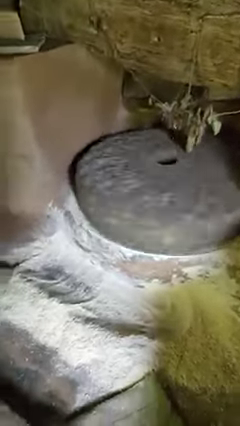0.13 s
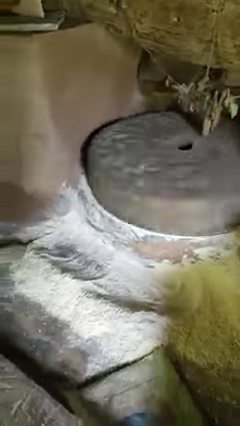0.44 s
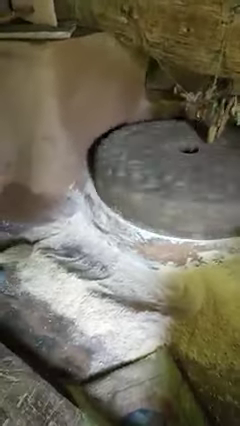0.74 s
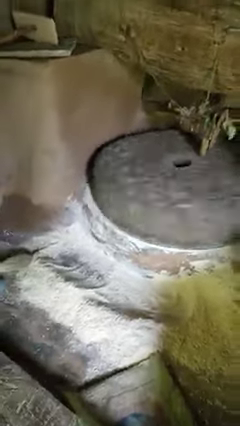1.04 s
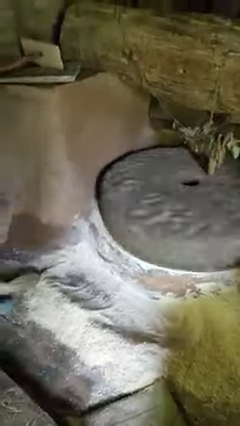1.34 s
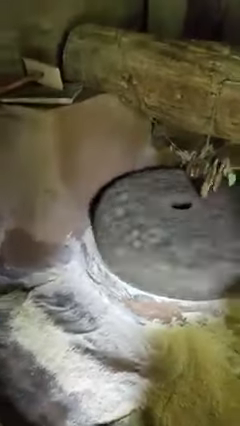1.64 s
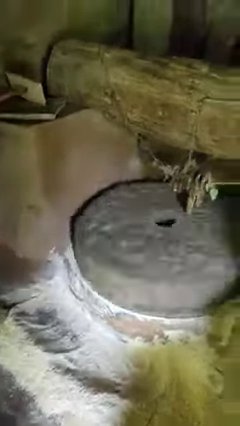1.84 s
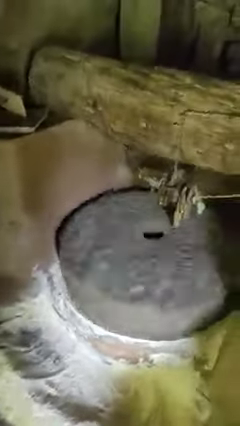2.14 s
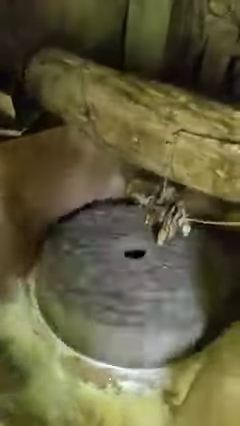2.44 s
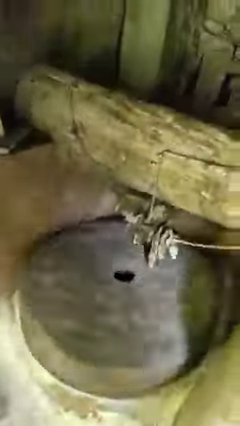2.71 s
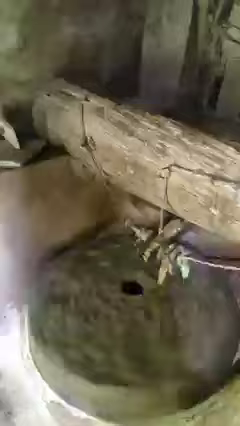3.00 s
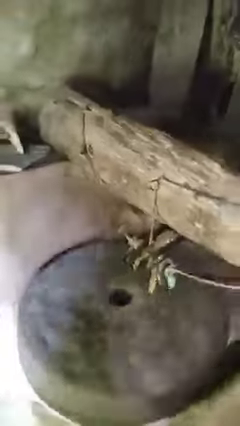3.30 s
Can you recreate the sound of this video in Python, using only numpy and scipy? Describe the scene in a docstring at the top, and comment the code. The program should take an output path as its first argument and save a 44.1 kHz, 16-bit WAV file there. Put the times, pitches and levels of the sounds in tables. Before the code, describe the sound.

Close stereo phone pickup of a working millstone: steady rough grinding with fine crackle, rushing water beneath, irregular wooden knocks that grow louder and denser in the second half, and a brief splash near the end.

```python
"""A turning millstone heard from close by in a small water mill: random grit impulses and noise excite
the resonances of stone and frame, with short groans and cracking kernels. A feed stick clacks about seven
times a second: a blow, a ring of decaying modes, a rattle of shaped noise and a reverberant tail. Water, as
patchy noise with fizzing drops and one splash, rushes under the floor. A hand-held phone with two
microphone ports, alike only in the bass, adds very low wobbles and a murmur of the grip."""
import sys
import numpy as np
from scipy import signal
from scipy.fft import rfft, irfft, next_fast_len
from scipy.io import wavfile
from scipy.ndimage import uniform_filter1d, map_coordinates

SR = 44100
rng = np.random.default_rng(int(sys.argv[2]) if len(sys.argv) > 2 else 0)


def digitize_waveform(pressure):
    """Quantize a signal to 16-bit integers and store it at the path in sys.argv[1].

    Rows of a 2-D input are taken as channels; values are limited to [-1, 1].
    """
    field = np.atleast_2d(pressure).T
    bounded = np.clip(field, -1, 1)
    quanta = np.round(bounded * 32767).astype(np.int16)
    wavfile.write(sys.argv[1], SR, quanta)


N = 152586  # length in samples

# Grinding level before the groans: time_s, level_db
GRIND_LEVEL = [(0.0, -40.5), (0.2, -30), (0.38, -38.5), (1.33, -35.5), (1.77, -37), (2.11, -36.5),
               (2.47, -32), (2.88, -38), (3.1, -32.5), (3.46, -34)]
# Resonances of stone and frame: centre_hz, width_hz, level_db
FRAME_MODES = [(172.3, 35.6, -4.5), (235.8, 27, -4.5), (297, 19.4, -0.5), (360, 66.5, -6),
               (408.5, 58, -6.5), (560.4, 25.4, -6.5), (901, 48, -9)]
# Swells of one resonance: centre_s, level_db (rms at the crest), pitch_hz
GROAN_EVENTS = [(0.014, -30, 285), (0.151, -24, 285), (0.263, -32.5, 167), (0.278, -26, 285),
                (0.551, -30, 280), (0.9, -30, 291), (1.329, -35, 377), (1.333, -30, 190),
                (1.469, -34.5, 236.4), (1.603, -27, 296), (1.605, -27.5, 393), (1.671, -33, 404),
                (1.741, -33.5, 285), (1.825, -29.5, 404), (1.952, -31.5, 398), (2.048, -32, 409),
                (2.073, -29, 280), (2.356, -28.5, 269), (2.417, -33, 280), (2.435, -31.5, 363),
                (2.438, -31.5, 409), (2.506, -29, 275), (2.669, -32, 275), (2.791, -33.5, 280),
                (2.9, -32.5, 172), (3.075, -31, 280), (3.122, -31, 415), (3.259, -32.5, 388),
                (3.422, -31, 393)]
# Resonances of cracking kernels: centre_hz, width_hz, level_db
KERNEL_MODES = [(990, 250, 0), (1980, 400, -2), (3000, 900, -4), (5000, 1800, -4)]
# Clacks of the stick: start_s, rattle_db (before its fade), blow_db, ring_db, tilt_db_per_octave
CLACK_EVENTS = [(.204, -25, -26, -32, -4.5), (.295, -26, -21.5, -36, -6.5), (.449, -28, -19, -45, 2),
                (.49, -29, -36, -44, -6.5), (.718, -30.5, -30, -46, -8), (.852, -30.5, -31, -30, -7.5),
                (.96, -34, -24, -36, -7), (1.296, -26.5, -17.5, -32, -4.5), (1.441, -33, -30, -28.5, -8),
                (1.649, -19, -15, -28, 1), (1.897, -26, -21, -38, -4), (2.03, -28.5, -22, -28, -5),
                (2.181, -28, -20.5, -21.5, -5), (2.318, -31, -20, -29, 2), (2.343, -35, -35, -42, 4),
                (2.415, -29.5, -19, -25.5, -0.5), (2.514, -29.5, -20, -36, -6),
                (2.637, -23.5, -12, -24.5, 0.5), (2.731, -48, -20.5, -30, -3),
                (2.815, -32.5, -22, -31.5, -14), (2.918, -31, -14, -24.5, 0.5), (3.047, -31, -29, -22.5, 9),
                (3.146, -29.5, -15, -19, 0), (3.225, -32, -18, -22.5, 0.5), (3.365, -34, -16, -23.5, -8)]
# Modes of the stick: pitch_hz, level_db (relative), t60_s
STICK_MODES = [(780, -5, .06), (915, -6, .1), (1062, -1, .125), (1250, -6, .05), (1760, -8, .07),
               (1980, -4, .13)]
# Spectrum of the rattle: frequency_hz, level_db (relative)
RATTLE_SPECTRUM = [(450, -19), (800, -5.5), (1050, 4), (1400, 0.5), (1800, 6), (2050, -1), (2350, 6.5),
                   (2800, 1.5), (3150, -16), (3550, 1), (4000, -5.5), (4500, 1.5), (5000, -12), (6000, -33),
                   (7500, -70)]
# Reverberation time of the room: frequency_hz, t60_s
ROOM_DECAY = [(300, 0.54), (1500, 0.17), (6000, 0.18)]
# Course of the water level, before its fluctuation: time_s, level_db
WATER_LEVEL = [(0, -27.5), (.42, -29.5), (1.79, -29.5), (2.08, -30.5), (2.92, -29.5), (3.1, -26.5),
               (3.46, -30.5)]
# Spectrum of the water above the floor's filtering: frequency_hz, level_db (relative, per Hz)
WATER_SPECTRUM = [(65, -22), (110, -12), (166, -1.5), (283, 5.5), (333, -1), (409, 3), (642, -9.5),
                  (929, -11), (1290, -12.5), (1940, -13), (3910, -14), (4600, -17.5), (5420, -12.5),
                  (7080, -26), (7530, -45), (8010, -58.5), (8690, -41.5), (13100, -35.5), (14800, -53)]
# Splashes, against the rush before colouring: full_s, level_db
SPLASH_EVENTS = [(3.112, 7)]
# Low wobbles of the hand: centre_s, length_s, level_db
HAND_WOBBLES = [(1.769, 0.17, -38), (1.919, 0.22, -34), (2.192, 0.32, -30), (2.492, 0.17, -20),
                (3.18, 0.23, -40)]
# Gain of the side signal, the half-difference of the ports: frequency_hz, side_gain_db
SIDE_GAIN = [(60, -40), (140, -27), (210, -20), (320, -19), (490, -11), (750, -3.5), (900, 1), (1060, 0),
             (1400, 0), (14400, -.7)]
# Right port's delay behind the left as the phone turns: time_s, lag_ms
PORT_LAG = [(0, 0.43), (1.2, 0.41), (1.5, -0.015), (3.46, -0.047)]

# Stone and kernels
GRIT_PER_S, GRIT_SPREAD_DB = 1500, 2
FRAME_LOW_HZ = 130  # the frame radiates little below this
GROAN_RISE_S, GROAN_FALL_S = 0.014, 0.017  # Gaussian widths
CRUNCH_PER_S, CRUNCH_SPREAD_DB, CRUNCH_DB = 700, 2, -38.5
# Stick
BLOW_HZ, BLOW_S = 950, .00075  # pitch, and time to the envelope's crest, of a clack with no upward tilt
TICK_DB, TICK_HZ, TICK_T60 = -6, 2300, .004  # a bright tick on the blow
HARD_DB_PER_OCTAVE = 5  # this much upward tilt makes the blow half as long and an octave higher
RING_RISE_S, RING_ROUGH_DB, RING_ROUGH_S = 0.0014, 3, .006  # the loose stick's ring flutters
RATTLE_RISE_S, RATTLE_HOLD_S, RATTLE_T60 = 0.0018, .014, .14
CHATTER_DB, CHATTER_S = 1.5, 0.0012  # the rattle comes in small clumps
ACROSS, ACROSS_S = 0.36, 0.00023  # share and delay of the direct sound in the side signal
ROOM_DB = -8
# Water
DROPS_PER_S, DROP_HZ, DROP_CYCLES, DROP_DB = 1500, 4000, 1.6, -14  # fizz on the rush
SPLASH_RISE_S, SPLASH_HOLD_S, SPLASH_T60, SPLASH_HZ = 0.0039, 0.027, 0.12, 3660
SPLASH_TICK_DB, SPLASH_TICK_T60 = -8, 0.024
WATER_THIN_HZ, WATER_THIN_DB = 550, -9  # the floor boards keep its bass back
# Hand, ports and band limit
WOBBLE_HZ, SWAY_DB = 30, -49
SHUFFLE_DB, SHUFFLE_HZ, SHUFFLE_LUMPS_DB = -57, 68, 5  # uneven low murmur of the grip
SHARED, SHARED_HZ = .18, 800  # part of the left port's treble that also reaches the right
LEFT_DB = -.6  # gain of the left port's treble
TOP_HZ = 14700


def stone():
    """Forced resonance: grit under the stone drives the frame; at times one resonance swells to a groan."""
    grit = unit(grains(GRIT_PER_S, GRIT_SPREAD_DB)) + 0.99 * rng.standard_normal((2, N))
    lumps = amp(1.3 * wobble(6.37) + 1.5 * wobble(15))
    grind = amp(curve(GRIND_LEVEL)) * unit(filtered(grit * lumps, frame))
    phases = rng.random((len(GROAN_EVENTS), 2))  # in turns, one for each channel
    for (centre, db, hz), phase in zip(GROAN_EVENTS, phases):
        middle = round(centre * SR)
        near = slice(max(middle - SR // 10, 0), min(middle + SR // 10, N))
        t = np.arange(near.start, near.stop) / SR
        u = (t - centre) / np.where(t < centre, GROAN_RISE_S, GROAN_FALL_S)
        tone = np.sin(2 * np.pi * (hz * t + phase[:, None]))
        grind[:, near] += np.sqrt(2) * amp(db) * np.exp(-u * u / 2) * tone
    return grind


def frame(f):
    """Modal response: resonances of stone and frame, with weak radiation in the bass."""
    return resonances(FRAME_MODES, f) / (1 + (FRAME_LOW_HZ / (f + 1)) ** 6)


def crunch():
    """Impulsive excitation: coarse kernels crack under the stone in uneven clumps and ring briefly."""
    cracks = amp(1.5 * wobble(30)) * grains(CRUNCH_PER_S, CRUNCH_SPREAD_DB)
    return amp(CRUNCH_DB) * unit(filtered(cracks, lambda f: resonances(KERNEL_MODES, f)))


def stick():
    """Impact superposition: each clack sums a blow and ring, the room's answer to them, and a rattle."""
    out = np.zeros((2, N + SR))
    t = np.arange(SR // 3) / SR
    for start, rattle_db, blow_db, ring_db, tilt_db in CLACK_EVENTS:
        struck = -amp(blow_db) * blow(t, tilt_db) - amp(ring_db) * ring(t)
        across = ACROSS * np.interp(t - ACROSS_S, t, struck)
        clack = ports([struck, across]) + amp(ROOM_DB) * room(struck)
        clack += ports(amp(rattle_db) * rattle(t, tilt_db))
        out[:, round(start * SR):][:, :len(t)] += clack
    return out[:, :N]


def blow(t, tilt_db):
    """Contact pulse: a brighter clack has a shorter, higher pulse; its tick fades sooner."""
    quick = t * 2 ** (max(tilt_db, 0) / HARD_DB_PER_OCTAVE)
    u = quick / BLOW_S
    pulse = u * np.exp(1 - u) * np.sin(2 * np.pi * BLOW_HZ * quick)
    return pulse + amp(TICK_DB - 60 * quick / TICK_T60) * np.sin(2 * np.pi * TICK_HZ * t)


def ring(t):
    """Modal decay: the stick's modes die exponentially while the level of each flutters."""
    total = np.zeros(len(t))
    for hz, level_db, t60 in STICK_MODES:
        strength_db = level_db + rng.normal(0, 0.66)
        flutter = np.interp(t, np.arange(60) * RING_ROUGH_S, rng.standard_normal(size=60))
        total += amp(strength_db - 60 * t / t60 + RING_ROUGH_DB * flutter) * np.sin(2 * np.pi * hz * t)
    return total * (1 - np.exp(-t / RING_RISE_S))


def rattle(t, tilt_db):
    """Filtered noise: clumped noise takes a tilted spectrum, holds briefly, then decays."""
    clumps = np.interp(t, np.arange(400) * CHATTER_S, rng.standard_normal(size=400))

    def spectrum(hz):
        tilt = tilt_db * np.log2(np.clip(hz, 600, 2600) / 1300)
        return amp(along(RATTLE_SPECTRUM, hz) + tilt)

    noise = filtered(amp(CHATTER_DB * clumps) * rng.standard_normal((2, len(t))), spectrum)
    fall = amp(-60 * np.clip(t - RATTLE_HOLD_S, 0, None) / RATTLE_T60)
    return (1 - np.exp(-t / RATTLE_RISE_S)) * fall * unit(noise)


def room(x):
    """Reverberation: convolution with a fresh noise tail whose frequencies decay at their own rates."""
    hz, t, z = signal.stft(rng.standard_normal((2, len(x))), SR, nperseg=256)
    decay = amp(-60 * t / along(ROOM_DECAY, hz)[:, None])
    tail = signal.istft(z * decay, SR, nperseg=256)[1]
    delayed = np.pad(x, (200, 0))[None]  # samples before the tail
    return ports(signal.fftconvolve(delayed, tail / np.linalg.norm(tail[0]), axes=1)[:, :len(x)])


def water():
    """Turbulence noise: rush, drops and splash share one spectrum, thinned in the bass by the floor."""
    mixed = rush() + amp(DROP_DB) * unit(drops()) + splash()

    def colour(hz):
        floor_db = WATER_THIN_DB / (1 + (hz / WATER_THIN_HZ) ** 4)
        return amp(along(WATER_SPECTRUM, hz) + floor_db)

    pair = filtered(mixed, colour)
    level_db = curve(WATER_LEVEL) + 0.83 * wobble(8.9) + 0.28 * wobble(25.16)
    return amp(level_db) * pair / np.std(pair[0])


def rush(patchy_db=2.2):
    """Modulated noise: the level varies in smooth patches of time and frequency."""
    z = signal.stft(rng.standard_normal((2, N)), nperseg=512)[2]
    field = uniform_filter1d(rng.standard_normal(z.shape[1:]), size=8, axis=0)  # over frequency
    field = uniform_filter1d(field, size=10, axis=1)  # over time
    return unit(signal.istft(z * amp(patchy_db * unit(field)), nperseg=512)[1][:, :N])


def drops():
    """Damped resonance: random impulses each ring for a cycle or two as fizzing drops."""
    w = DROP_HZ / DROP_CYCLES  # bandwidth in Hz
    return filtered(grains(DROPS_PER_S, spread_db=2.5),
                    lambda f: 1j * f * w / (DROP_HZ ** 2 - f * f + 1j * f * w))


def splash():
    """Noise burst: high-passed noise rises fast, with a tick just after it reaches full level, and decays."""
    t = np.arange(N) / SR
    swell = np.zeros(N)
    for full, db in SPLASH_EVENTS:
        rise = np.clip((t - full) / SPLASH_RISE_S + 1, 0, 1)
        fall = amp(db - 60 * np.clip(t - full - SPLASH_HOLD_S, 0, None) / SPLASH_T60)
        tick = amp(SPLASH_TICK_DB - 60 * np.abs(t - full - SPLASH_RISE_S) / SPLASH_TICK_T60)
        swell += rise * fall * (1 + tick)
    return swell * filtered(rng.standard_normal((2, N)), lambda f: 1 / (1 + (SPLASH_HZ / (f + 1)) ** 6))


def hand():
    """Common-mode motion: very low wobbles, sway and grip murmur reach both ports alike."""
    t = np.arange(N) / SR
    total = np.zeros(N)
    for centre, length, db in HAND_WOBBLES:
        window = np.cos(np.pi * np.clip((t - centre) / length, -.5, .5)) ** 2
        total += amp(db) * window * np.sin(2 * np.pi * WOBBLE_HZ * (t - centre))
    grip = wobble(5.6)
    murmur = filtered(rng.standard_normal(N), lambda f: np.exp(-(np.log2(f / SHUFFLE_HZ + 1e-6) / 0.9) ** 2))
    sway = filtered(rng.standard_normal(N), lambda f: np.exp(-((f - 28) / 9) ** 2))
    total += amp(SHUFFLE_DB + SHUFFLE_LUMPS_DB * grip) * unit(murmur)
    return total + amp(SWAY_DB + 1.4 * grip) * unit(sway)


def ports(pair):
    """Mid-side pickup: the first signal is common to both ports, the second, filtered, is opposed."""
    mid = filtered(pair[0], np.ones_like)
    side = filtered(pair[1], lambda hz: amp(along(SIDE_GAIN, hz)))
    return np.array([mid + side, mid - side])


def turned(x):
    """Delayed crosstalk: the right port takes a share of the left's treble at a changing lag."""
    high = filtered(x, lambda f: 1 / (1 + (SHARED_HZ / (f + 1)) ** 4))
    lagged = map_coordinates(high[0], [np.arange(N) - curve(PORT_LAG) * SR / 1000])
    left_change = (amp(LEFT_DB) - 1) * high[0]
    right_change = SHARED * lagged + (np.sqrt(1 - SHARED ** 2) - 1) * high[1]
    return x + np.array([left_change, right_change])


def resonances(modes, f):
    """Modal sum: band-pass resonances of (Hz, width Hz, dB) with alternating sign."""
    total = 0
    for k, (c, w, db) in enumerate(modes):
        total = total + (-1) ** k * amp(db) * 1j * f * w / (c * c - f * f + 1j * f * w)
    return total


def grains(per_s, spread_db):
    """Shot noise: two trains of random impulses with exponentially distributed levels in dB."""
    chance, sign, size = rng.random((3, 2, N))
    return (chance < per_s / SR) * np.sign(sign - .5) * amp(-spread_db * np.log(size + 0.00051))


def wobble(rate):
    """Slow fluctuation: a smooth random curve through up to 55 knots a second."""
    knots = rng.standard_normal(int(N * 60 / SR))
    return map_coordinates(knots, [np.arange(N) * min(rate, 55) / SR])


def filtered(x, response):
    """Linear filtering: the spectrum of x times a response of frequency."""
    n = np.shape(x)[-1]
    m = next_fast_len(n + 8192)
    return irfft(rfft(x, m) * response(np.fft.rfftfreq(m, 1 / SR)), m)[..., :n]


def along(points, hz):
    """Logarithmic frequency scale: interpolates (Hz, value) points."""
    f, v = np.transpose(points)
    return np.interp(np.log(hz + 1), np.log(f + 1), v)


def curve(rows):
    """Linear interpolation in time: one value per sample from (s, value) rows."""
    return np.interp(np.arange(N) / SR, *np.transpose(rows))


def amp(db):
    """Decibel law: amplitude ratio of a level."""
    return 10 ** (np.asarray(db) / 20)


def unit(x):
    """Effective value: scales x to an rms of one."""
    return x / np.sqrt(np.mean(x ** 2) + 1e-20)


def scene():
    """Superposition: stone, kernels and water pass the turned ports; stick and hand are added."""
    return turned(ports(stone() + crunch() + water())) + stick() + hand()


def record(dry):
    """Band limitation: removes everything from TOP_HZ upward."""
    return filtered(dry, lambda hz: hz < TOP_HZ)


dry = scene()
out = record(dry)
digitize_waveform(out)
```